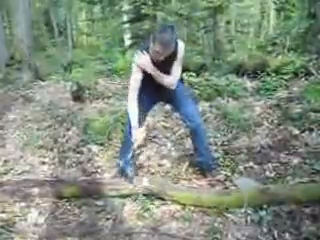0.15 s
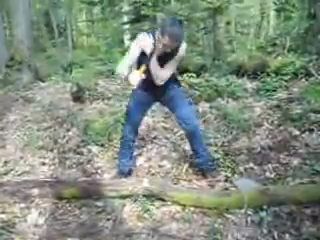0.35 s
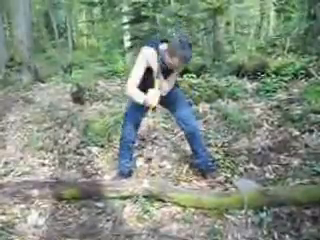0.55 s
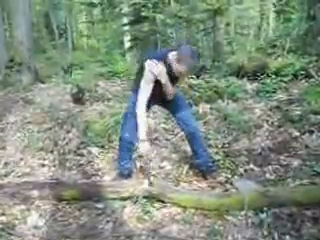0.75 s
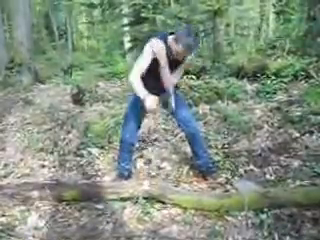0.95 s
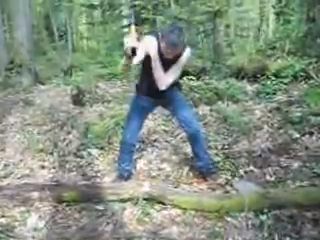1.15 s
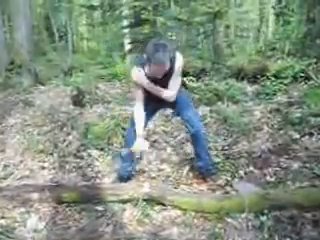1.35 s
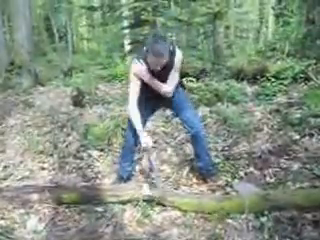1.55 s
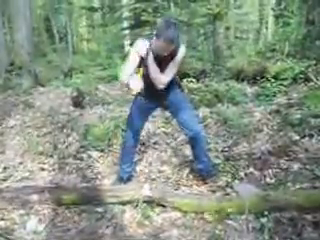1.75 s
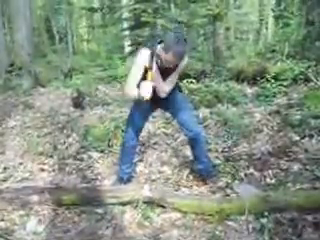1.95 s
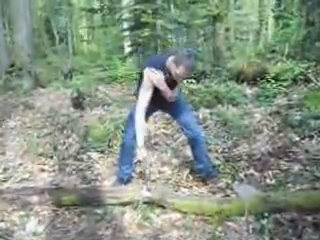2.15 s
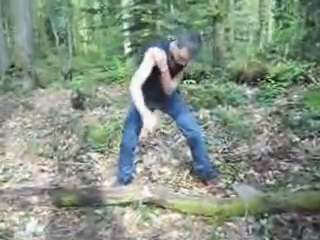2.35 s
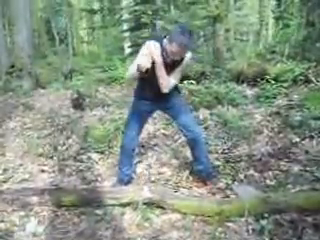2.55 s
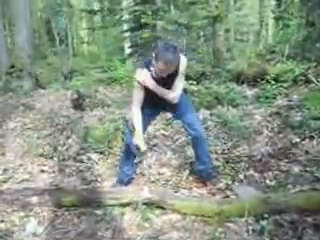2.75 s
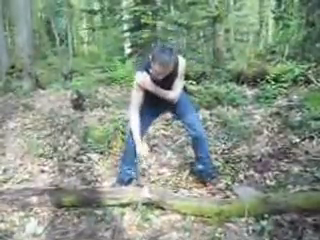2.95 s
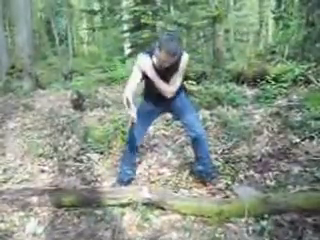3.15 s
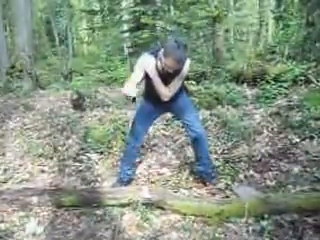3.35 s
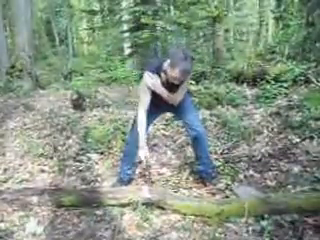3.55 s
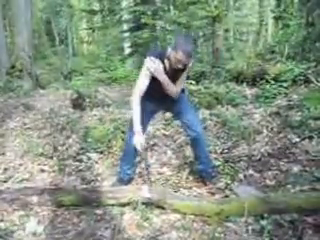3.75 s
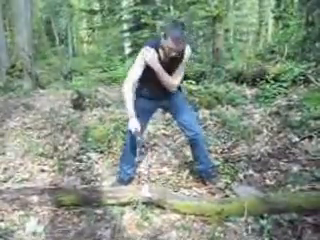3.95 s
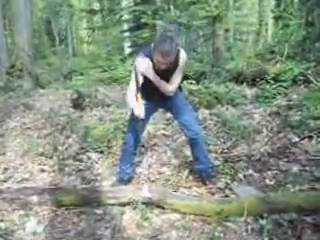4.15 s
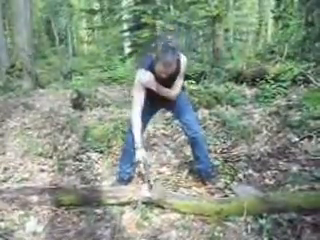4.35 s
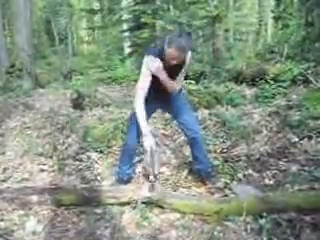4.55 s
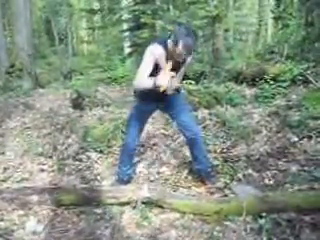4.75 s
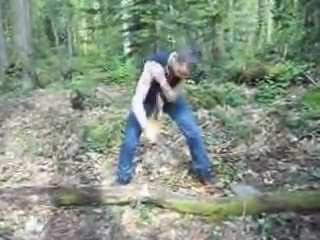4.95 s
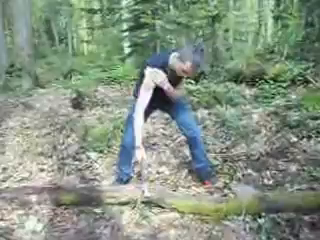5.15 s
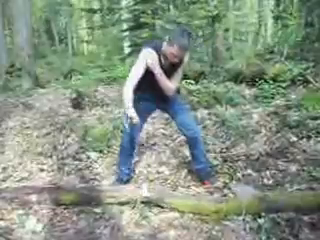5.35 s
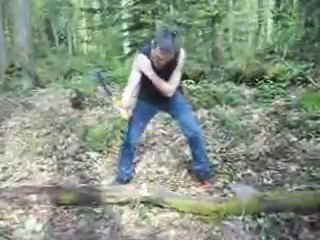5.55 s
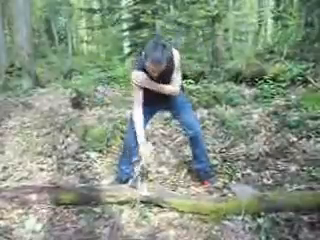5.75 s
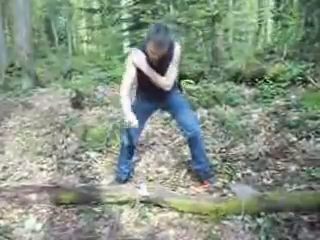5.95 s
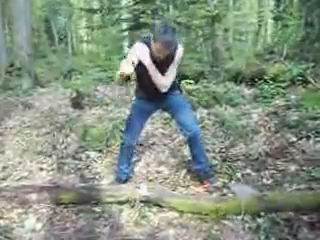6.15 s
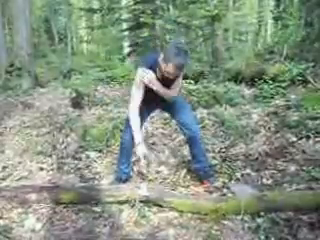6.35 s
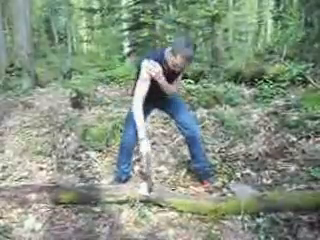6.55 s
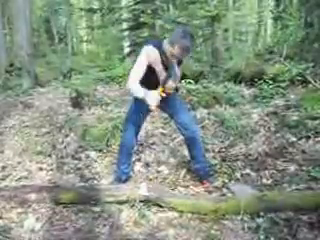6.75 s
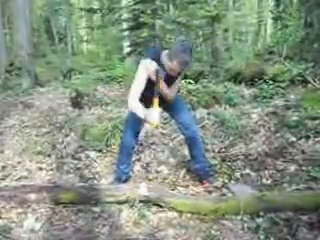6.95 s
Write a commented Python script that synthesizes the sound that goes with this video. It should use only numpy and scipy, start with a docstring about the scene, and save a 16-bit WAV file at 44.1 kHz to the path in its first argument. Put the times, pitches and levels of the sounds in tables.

```python
"""Hiss and birdsong among trees, and at once a hatchet on a mossy log, a few metres from a small camera.
Each blow is a burst of fibre noise and ringing log modes, answered by scattered noise from ground and trunks.
Low knocks rebound from trunks and chips tick in dry leaves, as short noise snaps and pings; birds are
gliding sines over a blurred far chorus.
After some blows everything heard swells louder, and drops back around the next blow."""
import sys
import numpy as np
from scipy import signal
from scipy.fft import rfft, irfft, next_fast_len
from scipy.io import wavfile
from scipy.ndimage import uniform_filter1d, map_coordinates

SR = 44100
rng = np.random.default_rng(int(sys.argv[2]) if len(sys.argv) > 2 else 0)


def to_wav(s):
    """Save 16-bit WAV."""
    ch = np.atleast_2d(s).T  # columns
    pcm = np.round(np.clip(ch, -1, 1) * 32767)  # PCM
    wavfile.write(sys.argv[1], SR, pcm.astype(np.int16))


N = 312889

# hatchet blows: t/s, crack level/dB, knock level/dB (log modes from 800 Hz), thud level/dB (modes below),
# near echo level/dB (relative to the dulled blow), brightness/(dB per octave), entry time constant/ms,
# strongest crack f/Hz
HATCHET_BLOWS = [(.0822, -17.5, -13, -17.5, -7, -2, 0.41, 7000),
                 (0.7968, -5, -15.5, -11.5, -10, -6, 0.98, 4840),
                 (1.5112, -12, -12.5, -19, -10, -1.5, 0.56, 5550),
                 (2.2282, -9, -11, -5, -9.5, -7, 0.75, 7790),
                 (2.933, -16, -20, -16.5, -9.5, -2.5, 0.63, 5110),
                 (3.654, -13, -18, -18.5, -9.5, -1.5, .6, 8820),
                 (4.474, -15, -19.5, -18.5, -8, 0, 0.64, 4730),
                 (5.1554, -12.5, -10.5, -6.5, -11, -5.5, 0.66, 3200),
                 (5.814, -27, -23, -13.5, -8, -6, 0.85, 3480),
                 (6.508, -14, -19.5, -19.5, -7, -0.5, 0.62, 6800)]
# dying away of the deep forest's answer: f/Hz, t60/s
DEEP_FOREST = [(100, 0.27), (500, 0.91), (1200, 0.81), (4000, 0.76), (10000, 0.58)]


def amp(db):
    """Decibels to amplitude."""
    return 10 ** (np.asarray(db) / 20)


def unit(x):
    """Scales x to an RMS of one."""
    return x / np.sqrt(np.mean(x ** 2) + 1e-20)


def along(points, hz):
    """Reads (f/Hz, value) points on a log frequency axis."""
    f, v = np.transpose(points)
    return np.interp(np.log(hz + 1), np.log(f + 1), v)


def coloured(x, gain):
    """Filters x by a gain that depends on frequency."""
    m = next_fast_len(x.shape[-1] + 4096)
    spectrum = rfft(x, m) * gain(np.fft.rfftfreq(m, 1 / SR))
    return irfft(spectrum, m)[:x.shape[-1]]


def log_bell(hz, centre_hz, width):
    """A bell-shaped gain on a log frequency axis; width in natural-log units."""
    return np.exp(-(np.log((hz + 1) / centre_hz) / width) ** 2)


def add(track, s, sound):
    """Mixes a sound into the track at time s."""
    part = track[round(s * SR):][:len(sound)]
    part += sound[:len(part)]


def echo(decays, gap_s, sound, lumpy_db):
    """A scattered answer: noise with the energy and broad colour of sound, building up, then dying by t60."""
    power = np.abs(rfft(sound, SR)) ** 2  # bins are 1 Hz apart
    treble = np.clip(np.arange(len(power)) / 1500 - 1, 0, 1)
    fine, broad = uniform_filter1d(power, size=220), uniform_filter1d(power, size=1800)
    power = (1 - treble) * fine + treble * broad
    noise = irfft(rfft(rng.standard_normal(SR)) * np.sqrt(np.abs(power)), SR)
    hz, t, z = signal.stft(noise, SR, nperseg=256)
    luck = np.clip(rng.standard_normal(len(t)), -2, 2)
    trunks = amp(lumpy_db * luck / (1 + hz[:, None] / 3000))  # single trunks stand out, most in the bass
    dying = amp(-60 * t / along(decays, hz)[:, None])
    tail = signal.istft(z * trunks * dying, SR, nperseg=256)[1][:SR]
    tail = tail * (1 - np.exp(-np.arange(SR) / SR / gap_s))
    return tail * np.linalg.norm(sound) / np.linalg.norm(tail)


def steady_hiss(level_db=-63):
    """Air and microphone hiss: steady noise through a fixed colour."""
    # hiss colour: f/Hz, relative level/dB; the two end points are left out
    hiss_colour = [(12, -30), (20, -6), (174, -5), (228, -4.5), (499, -2), (620, -6.5), (690, -4),
                   (1600, -8), (2270, -10), (5250, -12.5), (12800, -21.5), (16600, -53), (22000, -120)]
    hiss = coloured(rng.standard_normal(N), lambda hz: amp(along(hiss_colour[1:-1], hz)))
    return amp(level_db) * unit(hiss)


def breeze(level_db=-72):
    """Breeze in the bass: low noise whose level wanders in smooth lumps."""
    lumps = map_coordinates(rng.standard_normal(40), [np.linspace(0, 39, N)])
    rumble = coloured(rng.standard_normal(N), lambda hz: 1 / (1 + (hz / 60) ** 2))
    return amp(level_db + 2.1 * lumps) * unit(rumble)


def camera_tone():
    """The camera's own thin tone: a faint sine with a randomly wandering phase."""
    # thin tone: f/Hz, level/dB
    tone = (7900, -75)
    wander = np.cumsum(rng.standard_normal(N)) * .035
    return amp(tone[1]) * np.sin(2 * np.pi * tone[0] * np.arange(N) / SR + wander)


def air():
    """The place between blows: hiss, breeze and the camera's tone."""
    return steady_hiss() + breeze() + camera_tone()


def whistle(length_s, from_hz, to_hz, bend, db, warble):
    """One bird note: a gliding sine, warbled in pitch and level, fluttering on its way to the microphone."""
    u = np.linspace(0, 1, round(length_s * SR))
    beat = np.sin(2 * np.pi * 45 * length_s * u + rng.uniform(0, 2 * np.pi))  # 45 Hz warble
    knots = rng.standard_normal(3 + round(150 * length_s))
    # leaves and air scatter the sound
    flutter = amp(2.5 * np.interp(u, np.linspace(0, 1, len(knots)), knots))
    hz = (from_hz + (to_hz - from_hz) * u ** bend) * (1 + .02 * warble * beat)
    swell_and_fade = np.sin(np.pi * u) ** .5
    level = amp(db + 2.5) * flutter * swell_and_fade * (1 + np.clip(warble, 0, 1) * beat)
    return level * np.sin(2 * np.pi * np.cumsum(hz) / SR)


def far_chorus():
    """Distant birds run together: blotchy noise around 3.6 kHz with a slowly moving level."""
    # far birds: t/s, level/dB
    chorus_level = [(0, -65.5), (2.1, -66), (2.8, -70.5), (4.2, -76.5), (5.6, -64.5), (6.3, -65),
                    (7.1, -74)]
    z = signal.stft(rng.standard_normal(N), nperseg=512)[2]
    field = uniform_filter1d(uniform_filter1d(rng.standard_normal(z.shape), 4, 0), 16, 1)
    blur = signal.istft(z * amp(2.4 * unit(field)), nperseg=512)[1][:N]
    blur = coloured(blur, lambda hz: log_bell(hz, 3600, 0.31))
    level_db = np.interp(np.arange(N) / SR, *np.transpose(chorus_level))
    return amp(level_db) * unit(blur)


def birds(wet_db=-6, note_bend=.7):
    """Gliding whistles answered by the deep forest, over the far chorus."""
    # single notes: t/s, length/s, from f/Hz, to f/Hz, level/dB (before whistle's lift), warble/0-1
    single_notes = [(0, .075, 5450, 5400, -59.5, 0.5), (.25, .09, 2500, 2400, -68, 0.12),
                    (.99, .052, 3900, 4650, -61, 0.23), (1.09, .3, 3050, 3050, -70.5, 0.4),
                    (1.14, .04, 2900, 2250, -68, 0.07), (1.284, .03, 4045, 3500, -66.5, .2),
                    (1.31, .12, 3400, 3480, -68, .1), (1.44, .07, 3400, 3550, -57.5, 0.2),
                    (1.781, .037, 2850, 2400, -58, 0), (1.83, .21, 6900, 7450, -69, 0.33),
                    (2.154, .08, 7500, 7300, -63, 0.6), (2.52, .07, 5300, 5400, -69.5, .4),
                    (2.574, .14, 3800, 4300, -68.5, 0.6), (2.68, .22, 2580, 2420, -74.5, 0.2),
                    (3.485, .019, 4390, 5750, -63, 0.03), (3.7, .16, 3350, 3250, -64, .9),
                    (5.67, .11, 6900, 4190, -72.5, .9), (6.27, .14, 3500, 4200, -65, .8),
                    (6.25, .25, 2720, 2700, -70, .1), (6.77, .17, 2820, 2920, -66.5, 0.13),
                    (6.83, .06, 3730, 3730, -70, 0.12), (6.76, .16, 2020, 2050, -69, .8),
                    (6.97, .12, 2000, 1980, -65.5, 0.1)]
    # repeated syllables: first t/s, times, every/s, length/s, from f/Hz, to f/Hz,
    # bend (under 1 glides early), level/dB (before whistle's lift), warble/0-1
    syllables = [(.178, 8, .0763, .022, 5200, 4050, .8, -59, 0),
                 (1.1, 2, .208, .066, 4100, 5750, .8, -65, .3),
                 (1.215, 3, .208, .05, 5750, 4200, 1.2, -63, .2),
                 (3.295, 2, .585, .045, 2280, 2800, .9, -59, 0),
                 (3.33, 2, .585, .1, 2790, 2740, 1, -62, .85),
                 (5.11, 4, .142, .045, 4800, 3000, .4, -63.5, .2)]
    near = np.zeros(N)
    for s, times, every_s, *shape in syllables:
        for k in range(times):
            add(near, s + k * every_s, whistle(*shape))
    for s, length_s, from_hz, to_hz, db, warble in single_notes:
        add(near, s, whistle(length_s, from_hz, to_hz, note_bend, db, warble))
    forest = echo(DEEP_FOREST, .02, [1.], lumpy_db=1.5)
    return near + amp(wet_db) * signal.fftconvolve(near, forest)[:N] + far_chorus()


def splitting_fibres(from_contact, entry_ms, tilt_db, peak_hz, split_s=0.0024):
    """The crack: noise rising as the blade enters, held while fibres tear, then dying, sooner if dull."""
    # colour of splitting fibres: f/Hz, relative level/dB
    crack_colour = [(300, -36.5), (1500, -10.5), (3000, -4), (5000, -4), (8000, -3.5), (10000, -1.5),
                    (13000, -9)]
    t60_s, dull_shortens_s = 0.021, 0.001  # the second per dB per octave of brightness
    peak_db, peak_width_hz = 6, 290  # how far the strongest pitch stands out

    def gain(hz):
        tilt = tilt_db * np.log2((hz + 1) / 4000)
        peak = peak_db * np.exp(-((hz - peak_hz) / peak_width_hz) ** 2)
        return amp(along(crack_colour, hz) + tilt + peak)

    fibres = unit(coloured(rng.standard_normal(len(from_contact)), gain))
    entry = np.exp(np.minimum(from_contact, 0) / (entry_ms / 1000))
    decay_s = max(t60_s + dull_shortens_s * tilt_db, split_s)
    fading = amp(-60 * np.maximum(from_contact - split_s, 0) / decay_s)
    return fibres * entry * fading


def log_knock(from_contact, knock_db, thud_db, push_s=0.0008):
    """The log rings in its modes, each a decaying sine, pushed up quickly by the hatchet head."""
    # log modes: f/Hz, relative level/dB, t60/s; level and pitch vary a little from blow to blow
    log_modes = [(276, -3.5, 0.048), (363, -4.5, 0.047), (462.8, 0, 0.076), (554, -3.5, 0.065),
                 (660, -8.5, 0.093), (754, -13.5, 0.11), (1012, 1, 0.055), (1205.5, -1, .045),
                 (1315, -0.5, 0.036), (1637, -3, 0.05), (1890, -15.5, 0.046)]
    after = np.maximum(from_contact, 0)
    contact = np.argmax(from_contact >= 0)
    push = 1 - np.exp(-after / push_s)
    ringing = np.zeros(len(after))
    for hz, db, t60 in log_modes:
        luck = rng.standard_normal(2)
        # damp wood rings unsteadily
        drift = .3 * np.cumsum(rng.standard_normal(len(after))) * np.sqrt(hz / SR)
        drift = drift - drift[contact]
        group_db = thud_db if hz < 800 else knock_db
        size = amp(group_db + db + 1.5 * luck[0] - 60 * after / t60)
        phase = 2 * np.pi * hz * (1 + 0.022 * luck[1]) * after
        ringing += size * push * np.sin(phase + drift)
    return ringing


def chopping(far_db=-21, low_hz=220, moss_hz=4000):
    """The edge splits fibres, the head knocks the log; ground, trunks and deep forest answer."""
    # dying away at the nearest trunks and ground: f/Hz, t60/s
    near_decay = [(100, 0.39), (500, 0.15), (1500, 0.11), (4000, 0.16), (10000, 0.13)]
    out = np.zeros(N)
    lead_s = .005  # room for the blade's entry ahead of contact
    from_contact = np.arange(SR // 4) / SR - lead_s
    high_pass = signal.butter(3, low_hz, "high", fs=SR, output="sos")
    for s, crack_db, knock_db, thud_db, near_db, tilt_db, entry_ms, peak_hz in HATCHET_BLOWS:
        blow = amp(crack_db) * splitting_fibres(from_contact, entry_ms, tilt_db, peak_hz)
        blow += log_knock(from_contact, knock_db, thud_db)
        blow = signal.sosfilt(high_pass, blow)  # keeps the blow free of deep bass
        add(out, s - lead_s, blow)
        # moss and leaves swallow the treble
        dull = coloured(blow, lambda hz: 1 / np.sqrt(1 + (hz / moss_hz) ** 2))
        add(out, s, amp(near_db) * echo(near_decay, .01, dull, lumpy_db=4))
        add(out, s, amp(far_db) * echo(DEEP_FOREST, .015, blow, lumpy_db=1.5))
    return out


def rebounds_and_ticks(out, t):
    """Low knocks rebounding from trunks just after blows, and chips and twigs ticking: snaps of noise."""
    # low knocks (near 780-1200 Hz) and leaf ticks (higher): t/s, level/dB (before a 4 dB cut), centre f/Hz
    snap_list = [(.1235, -25, 797), (0.13, -20, 960), (.162, -32.5, 3520), (.198, -39, 7000),
                 (0.48, -43, 4520), (0.775, -24, 5070), (1.188, -50, 8000), (1.404, -45, 7450),
                 (1.907, -49, 5000), (1.943, -42, 6300), (2.010, -38.5, 796), (2.479, -45.5, 6000),
                 (2.952, -27, 1200), (2.974, -23.5, 813), (2.982, -27.5, 900), (2.988, -24, 786),
                 (2.999, -30, 900), (3.019, -38, 4200), (3.957, -45, 4500), (3.982, -47.5, 4500),
                 (4.3398, -43, 3900), (4.7075, -40.5, 2520), (4.751, -45.5, 5460), (5.861, -29.5, 1200),
                 (5.868, -28.5, 890), (5.879, -32, 796), (7.011, -44, 4480)]
    for s, db, centre_hz in snap_list:
        snap = coloured(rng.standard_normal(len(t)), lambda hz: log_bell(hz, centre_hz, 0.7))
        add(out, s, amp(db - 4 - 60 * t / .011) * unit(snap))


def leaf_stir(out, t, base_db=-66, count=90):
    """A faint stir of leaves: very short bright noise ticks at random times."""
    times, sizes = rng.uniform(0, N / SR, size=count), rng.exponential(1, size=count)
    for s, size in zip(times, sizes):
        level = amp(base_db + 3 * min(size, 3) - 60 * t / .006)
        add(out, s, level * np.diff(rng.standard_normal(len(t) + 1)))


def chip_shower(out, t, base_db=-44, mean_fall_s=0.048, count=70):
    """Small chips landing after each blow: damped pings, later ones softer, higher ones shorter."""
    for s, *_ in HATCHET_BLOWS:
        delays = rng.exponential(mean_fall_s, count)
        pitches = 1800 * np.exp(.8 * rng.standard_normal(count))
        sizes = rng.exponential(1, count)
        levels_db = base_db + 3 * np.minimum(sizes, 3) - 60 * delays
        for delay, hz, db in zip(delays, pitches, levels_db):
            ping = np.exp(-hz * t / 0.92) * np.sin(2 * np.pi * np.minimum(hz, SR / 4) * t)
            add(out, s + delay, amp(db) * ping)


def small_sounds():
    """Around the log: rebounding knocks, ticks, a faint stir of leaves and a shower after each blow."""
    out, t = np.zeros(N), np.arange(500) / SR
    rebounds_and_ticks(out, t)
    leaf_stir(out, t)
    chip_shower(out, t)
    return out


def swell_db():
    """Each swell climbs towards its height, falls at once to what is left, and settles."""
    # swells: start t/s, drop t/s, height/dB, left after the drop/dB
    swell_list = [(0, 0.086, 9.5, 0.5), (2.333, 2.931, 19.5, 3), (3.733, 4.462, 7.5, 0.5),
                  (4.323, 4.468, 7.5, 0.5), (5.266, 5.825, 19.5, 7)]
    rise_s, settle_s = 0.17, 0.41  # time constants
    t, level = np.arange(N) / SR, np.zeros(N)
    for start, drop, height_db, left_db in swell_list:
        rise = height_db * (1 - np.exp(-np.maximum(t - start, 0) / rise_s))
        settling = left_db * np.exp(-np.abs(t - drop) / settle_s)
        level += np.where(t < drop, rise, settling)
    return level


def scene():
    """Everything that reaches the microphone, in one channel."""
    return (air() + birds() + chopping() + small_sounds())[None]


def record(dry):
    """Soft saturation, swelling level, a fixed gap near 11 kHz, a steep treble roll-off, limited peaks."""
    # fixed treble response: f/Hz, gain/dB
    treble_response = [(10450, 0.5), (10750, -16.5), (11350, -19), (11600, 2.5), (12850, 2), (13000, -32.5)]
    top_hz = 13561  # nothing is kept from here up
    x = dry[0] / (1 + np.abs(dry[0] / .8) ** 4) ** (1 / 4)
    x = coloured(x * amp(swell_db()), lambda hz: amp(along(treble_response, hz)))
    x = x / (1 + np.abs(x) ** 8) ** (1 / 8)  # a harder knee, just under full scale
    return np.clip(coloured(x, lambda hz: hz < top_hz), -1, 1)[None]


dry = scene()
out = record(dry)
to_wav(out)
```